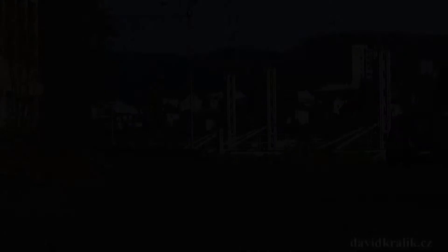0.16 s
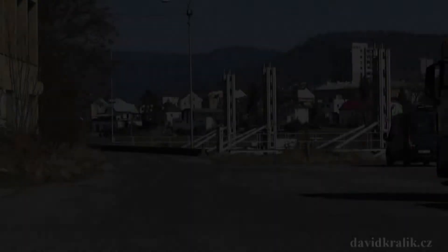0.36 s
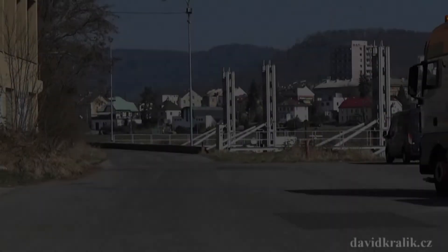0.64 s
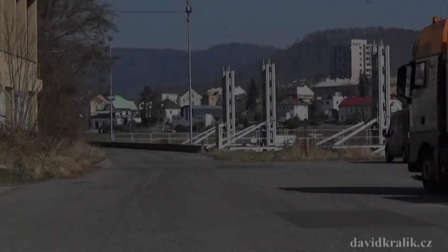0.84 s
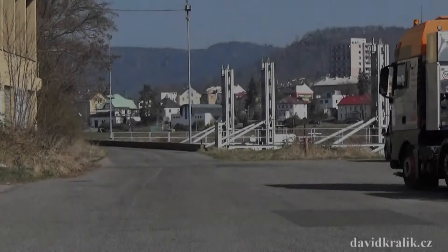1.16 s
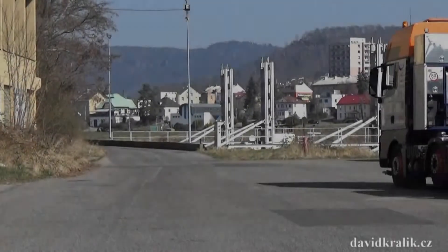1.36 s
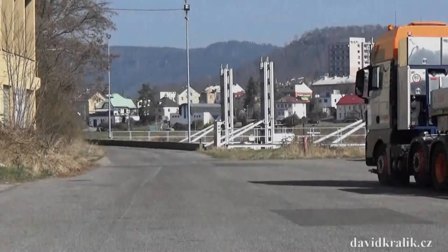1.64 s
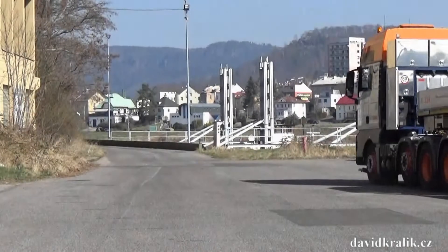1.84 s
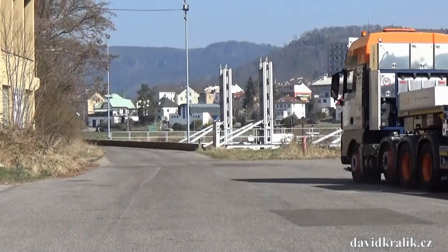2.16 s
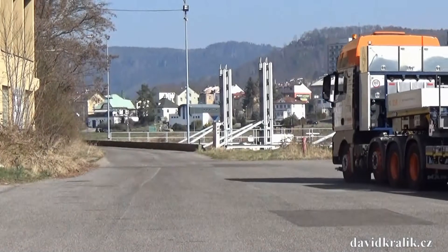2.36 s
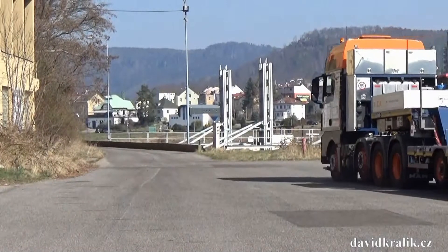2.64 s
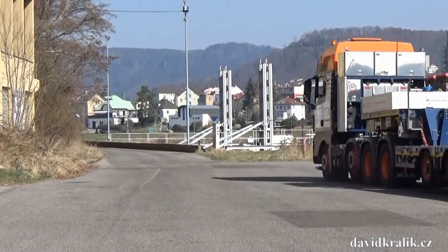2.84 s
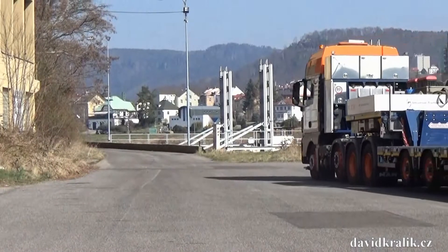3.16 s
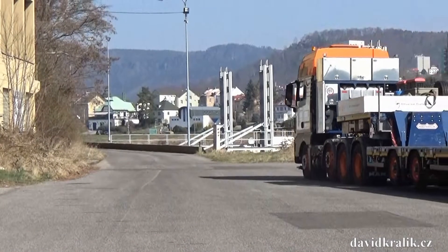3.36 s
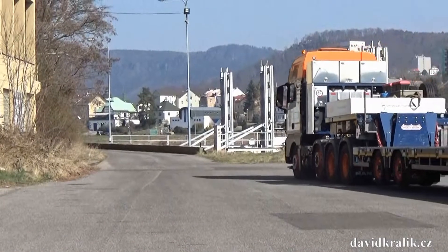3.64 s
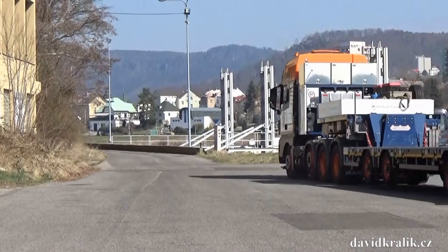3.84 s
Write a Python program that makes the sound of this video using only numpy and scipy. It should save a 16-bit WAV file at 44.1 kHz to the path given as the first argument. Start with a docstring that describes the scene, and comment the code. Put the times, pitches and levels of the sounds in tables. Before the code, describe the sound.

Steady, noisy diesel engine and tyre roar of a heavy truck passing outdoors at moderate distance, revs rising slightly, thin hiss-like whistle above, small dull bumps and a loose metal clank late, then easing away.

```python
"""On a paved yard road, a heavy diesel truck pulls slowly past, gathering speed; the sound fades in.
Firing cylinders ring the engine block, puffs of noise make the clatter, and broad noise is fan and tyres.
Tones tied to the engine speed hum, and narrow bands of noise whistle up and down for turbo and intake.
In the second half there are short dull bumps, and a brief rattle made of bright noise and ringing metal."""
import sys
import numpy as np
from scipy import signal
from scipy.fft import rfft, irfft
from scipy.io import wavfile

SR = 44100
rng = np.random.default_rng(int(sys.argv[2]) if len(sys.argv) > 2 else 0)


def to_wav(s):
    """Save 16-bit WAV."""
    ch = np.atleast_2d(s).T  # columns
    pcm = np.round(np.clip(ch, -1, 1) * 32767)  # PCM
    wavfile.write(sys.argv[1], SR, pcm.astype(np.int16))


N = 176400
T = np.arange(N) / SR  # time of every sample, s
HZ = np.fft.rfftfreq(N, 1 / SR)  # frequencies used by the filters

# How fast the engine turns. Each row: time in seconds, four-stroke cycles per second.
ENGINE_SPEED = [(0, 8.09), (.6, 8.14), (1.1, 8.365), (1.5, 8.56), (2, 8.865), (2.5, 9.115), (3, 9.335),
                (3.5, 9.475), (4, 9.53)]
# Loudness of the engine and rolling noise before the fade-in. Each row: time in seconds, level in dB.
PASS_LEVEL = [(.21, -31.5), (.31, -33), (.44, -32), (.53, -33.5), (.59, -31.3), (.72, -32.7), (.81, -30),
              (.93, -31.5), (1.15, -30.5), (1.5, -30.5), (1.85, -29.5), (2.1, -29), (2.45, -29.5),
              (2.8, -30.5), (3.2, -30.4), (3.6, -31.5), (4, -33.5)]
# Colour of the truck coming, alongside and leaving. Each row: frequency in Hz, relative level in dB.
COMING_COLOUR = [(20, -40), (35, -39), (55, -14), (80, -7), (120, -12), (190, -7), (260, -8), (400, -2.5),
                 (530, -1), (720, 1), (900, 4.5), (1200, 0.5), (1800, 0.5), (3000, -3.5), (5400, -11),
                 (8350, -19.5), (11000, -26.5), (15500, -40)]
BESIDE_COLOUR = [(20, -44), (35, -34), (55, -19), (110, -14.5), (190, -13), (300, -4), (370, -6.5),
                 (470, -3), (680, 0.5), (880, -0.5), (955, -3.5), (1020, 3), (1120, -6), (1550, -3),
                 (1850, -2.8), (2400, -6), (3100, -5.5), (3700, -7), (5000, -13.5), (6300, -18),
                 (7300, -21), (9300, -25.5), (11000, -33), (13000, -34.5), (15500, -48)]
LEAVING_COLOUR = [(15, -58), (25, -24), (82, -5), (193, -7), (281, 2), (378, -7), (421, 2.5), (567, 3.5),
                  (631, 2.5), (871, 4.5), (1170, 0), (1270, 4.5), (1380, -1), (1800, 1.5), (2230, -1.5),
                  (3440, -5.5), (4870, -12), (5580, -11.5), (7700, -23), (9300, -24.5), (15500, -41)]
# How the block colours the knocks. Each row: frequency in Hz, relative level in dB.
BLOCK_COLOUR = [(100, 1), (400, 3), (1500, -5), (4000, -1), (10000, -1)]
# Tones of exhaust, belt drive and gears. Each row: pitch as a multiple of the engine cycle rate,
# time when loudest in seconds, level in dB, width of the swell in seconds.
HUM_TONES = [(18, 2.1, -52, .6), (25.55, 2.05, -49, .35), (32, 2.45, -51.5, .7), (36, 1.6, -52, .4),
             (37.9, 1.8, -52, .5), (48, 2.5, -52, .4), (49.85, 1.7, -49.5, .4), (58, 2.4, -47.5, .35),
             (60, 2.8, -47.5, .9), (70, 1.45, -49, .4), (81.25, 2.65, -45, .35), (92, 3, -46, .45),
             (93, 1.9, -45, .3), (95.3, 2.1, -43, .2), (99, 2.8, -49, .45), (108.1, 2.7, -47, .7),
             (118.1, 3.15, -50, .5), (151.4, 1.55, -49, .25), (152.15, 2.45, -45, .3),
             (168.35, 1.9, -47.5, .25), (169.15, 2.55, -48.5, .3)]
# Pitch of the turbo whistle. Each row: time in seconds, frequency in Hz.
TURBO_PITCH = [(.3, 8020), (.7, 8060), (1.05, 8160), (1.3, 8420), (1.6, 9010), (1.9, 9570), (2.3, 10160),
               (2.58, 10320), (3.03, 9600), (3.35, 9250), (3.7, 8820), (4, 8450)]
# Swells and dips of the turbo whistle. Each row: time in seconds, level in dB.
TURBO_SWELL = [(.3, -70), (.65, -55), (1.08, -63), (1.3, -51), (1.43, -57), (1.56, -52), (1.76, -60),
               (1.95, -60), (2.12, -57), (2.33, -63), (2.85, -69), (3.15, -61), (3.35, -65), (3.72, -59),
               (4, -61)]
# Pitch of the breathy intake whistle. Each row: time in seconds, frequency in Hz.
INTAKE_PITCH = [(.5, 5100), (.9, 5340), (1.25, 5770), (1.6, 5990), (2.1, 5920), (2.55, 5700), (2.9, 5700)]
# Swells and dips of the intake whistle. Each row: time in seconds, level in dB.
INTAKE_SWELL = [(.5, -55), (.9, -52), (1.25, -53), (1.6, -51.5), (2.102, -46.5), (2.55, -51), (2.8, -71)]
# Strikes of the loose metal. Each row: start in seconds, level in dB.
RATTLE_STRIKES = [(2.7918, -34), (2.8002, -33.5), (2.807, -40), (2.844, -32), (2.855, -42), (2.8706, -25.5),
                  (2.905, -37)]
# Colour of the metal contact. Each row: frequency in Hz, relative level in dB.
CONTACT_COLOUR = [(500, -13), (2000, -3), (3400, 9.5), (7300, -2), (9300, -0.5), (12000, -17), (15500, -16)]
# Ringing notes of the metal. Each row: frequency in Hz, level in dB within a strike,
# time to die away by 60 dB in seconds.
METAL_MODES = [(3180, -13, .068), (3693, -16, .046), (4150, -17, 0.069), (5700, -14, .04)]
# Dull bumps. Each row: centre time in seconds, frequency in Hz, level in dB, length in seconds.
DULL_BUMPS = [(2.066, 1190, -27.5, 0.0062), (2.088, 850, -23, 0.0031), (2.482, 78, -40, 0.0091),
              (3.119, 760, -26, 0.0048)]
# Loudness of the low drone of the trailer tyres. Each row: time in seconds, level in dB.
RUMBLE_LEVEL = [(.2, -62), (1, -65), (2, -76), (2.7, -59), (3.4, -58), (4, -63)]
# Colour of that drone. Each row: frequency in Hz, relative level in dB.
TYRE_COLOUR = [(25, -36), (45, -13), (75, 9), (110, -1), (220, 16), (400, -4), (1000, -30)]
# Level of the sound that widens the stereo. Each row: frequency in Hz, level in dB.
WIDTH_COLOUR = [(60, -23), (250, -17.5), (1000, -12.5), (4000, -14.5), (8000, -12), (12000, -26)]
# Lean between left and right. Each row: time in seconds, left minus right in dB.
STEREO_LEAN = [(0, -1), (1.2, 0), (2, 0.55), (4, 0.5)]
# Colour of the left side against the right. Each row: frequency in Hz, level in dB.
LEFT_TINT = [(100, -1), (450, 0), (1000, -0.17), (2000, -1), (4000, -1.5), (12000, -0.5)]

COMING_S, BESIDE_S, LEAVING_S = 1, 1.84, 3.9  # when each colour of the truck is full
ROAR_DB, KNOCK_DB, CLATTER_DB = 0.5, -5, -11  # balance inside the body noise
CYLINDERS, VALVE_BEATS = 8, 16  # per engine cycle
KNOCK_T60, KNOCK_SPREAD_DB = 0.098, 0.2  # seconds to die away by 60 dB; uneven strength
KNOCK_PATH_S = .011  # longest possible delay from a cylinder
CLATTER_DEPTH, CLATTER_SPREAD_DB = 1, 1  # depth of the puffs (1 = full); uneven strength
TONE_WAVER, TONE_DRIFT = 0.26, 0.4  # share of the level, radians
TONE_ROUGH, TONE_ROUGH_HZ = 0.44, 22  # smear by uneven firing: share of the level, spread
WHISTLE_JITTER_HZ = 25
TURBO_WIDTH_HZ, TURBO_FUZZ = 160, 0.98  # fuzz is the share of the power that is air noise
INTAKE_WIDTH_HZ, INTAKE_FUZZ = 450, 0.93
RATTLE_RISE_S, RATTLE_T60 = 0.0018, 0.024  # T60: seconds to die away by 60 dB
RATTLE_SCATTER_DB, RATTLE_SCATTER_T60 = -22.5, .09
FADE_START_S, FADE_END_S, FADE_SHAPE = .16, 1.57, 0.88


def amp(db):
    """Turns decibels into a gain."""
    return 10 ** (np.asarray(db) / 20)


def unit(x):
    """Scales a sound to an average (rms) strength of 1."""
    return x / np.sqrt(np.mean(abs(x) ** 2) + 1e-20)


def curve(rows):
    """Reads a table of (time, value) at every sample, with straight lines between the rows."""
    return np.interp(T, *np.transpose(rows))


def colour(x, points):
    """Filters a sound by a table of (Hz, dB)."""
    hz, db = np.transpose(points)
    gain = amp(np.interp(np.log(HZ + 1), np.log(hz + 1), db))
    return irfft(rfft(x) * gain, N)


def wander(rate_hz):
    """Makes a smooth random curve of rms 1; a higher rate moves faster."""
    smoothing = np.exp(-.5 * (HZ / rate_hz) ** 2)
    return unit(irfft(rfft(rng.standard_normal(N)) * smoothing, N))


def cycles():
    """Counts the engine cycles turned so far by adding up the speed."""
    return np.cumsum(curve(ENGINE_SPEED)) / SR


def body():
    """Engine and rolling noise, changing colour as the truck turns its side and then its back."""
    drive = amp(KNOCK_DB) * knocks() + amp(CLATTER_DB) * clatter() + amp(ROAR_DB) * roar()
    views = (COMING_COLOUR, BESIDE_COLOUR, LEAVING_COLOUR)
    # each view fades over into the next
    shares = [np.interp(T, [COMING_S, BESIDE_S, LEAVING_S], row) for row in np.eye(3)]
    mix = sum(share * unit(colour(drive, view)) for share, view in zip(shares, views))
    return amp(curve(PASS_LEVEL)) * mix


def knocks():
    """Each cylinder fires once a cycle and rings its own dense modes of the block, by its own path."""
    firing = np.floor(cycles() * CYLINDERS).astype(int)
    at = np.flatnonzero(np.diff(firing))
    strength = amp(KNOCK_SPREAD_DB * rng.standard_normal(len(at)))
    ring_time, out = T[:SR // 10], np.zeros(N)
    for cylinder in range(CYLINDERS):
        blows = np.zeros(N)
        blows[at] = strength * (firing[at] % CYLINDERS == cylinder)
        age = ring_time - KNOCK_PATH_S * rng.random()
        # fading noise stands for many modes ringing at once
        ring = rng.standard_normal(len(ring_time)) * amp(-60 * age / KNOCK_T60) * (age > 0)
        out += signal.oaconvolve(blows, ring)[:N]
    return colour(unit(out), BLOCK_COLOUR)


def clatter():
    """Injectors and valves give an uneven puff of noise at each beat."""
    gate = 1 + CLATTER_DEPTH * np.cos(2 * np.pi * cycles() * VALVE_BEATS)
    unevenness = amp(CLATTER_SPREAD_DB * wander(rate_hz=72))
    return unit(gate * unevenness * rng.standard_normal(N))


def roar():
    """Fan and tyres make broad noise with a slight flutter."""
    flutter = amp(0.55 * wander(rate_hz=14))
    return unit(rng.standard_normal(N) * flutter)


def hum():
    """Wavering tones locked to the engine speed, each swelling and fading as the truck moves."""
    turns, out = cycles(), np.zeros(N)
    for order, peak_s, db, width_s in HUM_TONES:
        swell = 1 / np.sqrt(1 + ((T - peak_s) / width_s) ** 4)
        level = amp(db) * swell * (1 + TONE_WAVER * wander(rate_hz=4.3))
        phase = 2 * np.pi * (order * turns + rng.random()) + TONE_DRIFT * wander(rate_hz=1.9)
        smear = TONE_ROUGH * wander(TONE_ROUGH_HZ) * np.cos(phase)
        out += level * np.sqrt(2) * (np.sin(phase) + smear)
    return out


def whistles():
    """The thin note of the turbo above the breathier one of the intake."""
    turbo = whistle(TURBO_PITCH, TURBO_SWELL, TURBO_WIDTH_HZ, TURBO_FUZZ)
    intake = whistle(INTAKE_PITCH, INTAKE_SWELL, INTAKE_WIDTH_HZ, INTAKE_FUZZ)
    return turbo + intake


def whistle(pitch, level, width_hz, fuzz_share):
    """A tone in a narrow band of air noise that follows a pitch curve, a little unsteadily."""
    share = np.clip(fuzz_share, 0, 1)
    air = np.sqrt(share) * (wander(width_hz / 2) + 1j * wander(width_hz / 2))
    pure = np.sqrt(2 * (1 - share))
    hz = curve(pitch) + WHISTLE_JITTER_HZ * wander(rate_hz=13.76)
    carrier = np.exp(2j * np.pi * np.cumsum(hz) / SR)
    return amp(curve(level)) * ((air + pure) * carrier).real


def rattle():
    """Loose metal strikes a few times: bright contact, short ring and faint scatter off the trailer."""
    hiss, out = unit(colour(rng.standard_normal(N), CONTACT_COLOUR)), np.zeros(N)
    for start_s, db in RATTLE_STRIKES:
        age = np.maximum(T - start_s - RATTLE_RISE_S, 0)
        scatter = amp(RATTLE_SCATTER_DB - 60 * age / RATTLE_SCATTER_T60)
        contact = hiss * (amp(-60 * age / RATTLE_T60) + scatter)
        ring = np.zeros(N)
        for hz, mode_db, t60 in METAL_MODES:
            ring += amp(mode_db - 60 * age / t60) * np.sin(2 * np.pi * hz * (T - start_s))
        rise = np.clip((T - start_s) / RATTLE_RISE_S, 0, 1)
        out += amp(db) * rise * (contact + ring)
    return out


def bumps():
    """Heavily damped knocks: short swings that rise and fall smoothly around a centre time."""
    out = np.zeros(N)
    for centre_s, hz, db, length_s in DULL_BUMPS:
        swell = np.exp(-((T - centre_s) / length_s) ** 2)
        out += amp(db) * swell * np.sin(2 * np.pi * hz * (T - centre_s))
    return out


def rumble():
    """A low drone of the trailer's tyres: there early, nearly gone at 2 s, strongest towards the end."""
    return amp(curve(RUMBLE_LEVEL)) * unit(colour(rng.standard_normal(N), TYRE_COLOUR))


def scene():
    """The truck with a slight lean that moves from right to left, widened by the yard's diffuse sound."""
    truck = body() + rumble() + hum() + whistles() + rattle() + bumps()
    # fresh random draws, added on the left and subtracted on the right, make the sound wide
    side = colour(body() + rumble() + whistles() + rattle(), WIDTH_COLOUR)
    lean = amp(curve(STEREO_LEAN) / 2)
    left = colour(truck + side, LEFT_TINT) * lean
    right = (truck - side) / lean
    return np.array([left, right])


def record(dry):
    """A long fade-in, then a filter that removes the sound above about 15.5 kHz."""
    fade = np.clip((T - FADE_START_S) / (FADE_END_S - FADE_START_S), 0, 1) ** FADE_SHAPE
    low_pass = signal.firwin(511, 15500, window=("kaiser", 9), fs=SR)
    return signal.oaconvolve(dry * fade, low_pass[None], "same")


dry = scene()
out = record(dry)
to_wav(out)
```